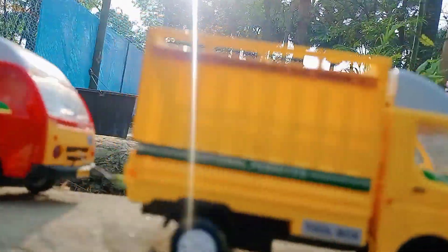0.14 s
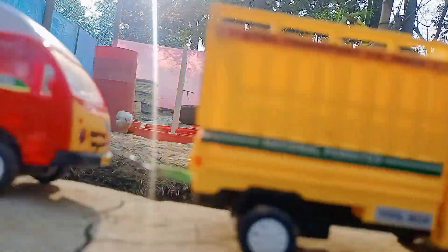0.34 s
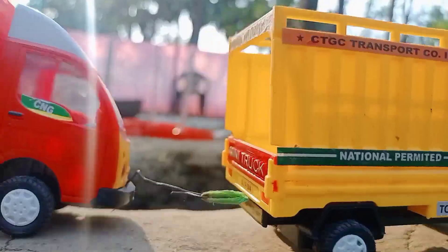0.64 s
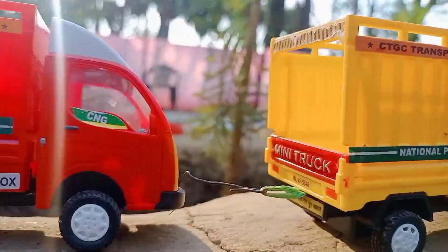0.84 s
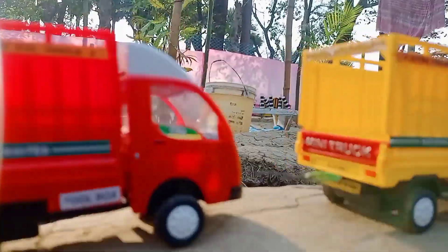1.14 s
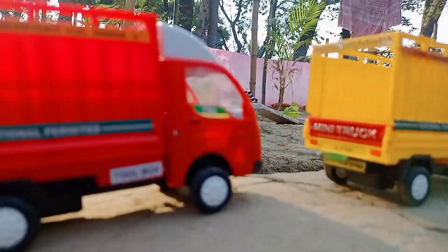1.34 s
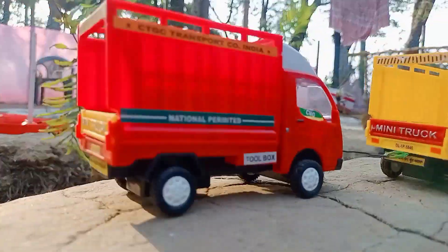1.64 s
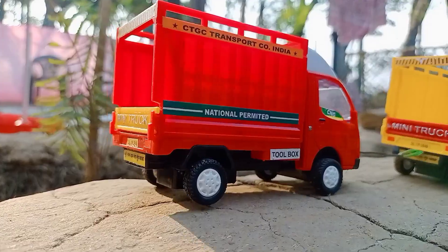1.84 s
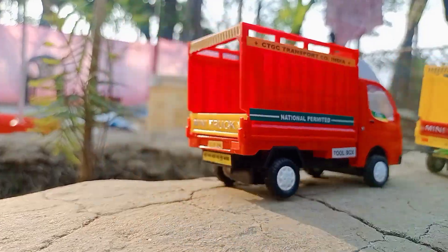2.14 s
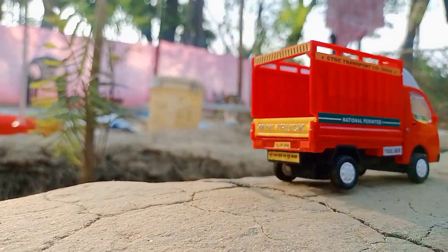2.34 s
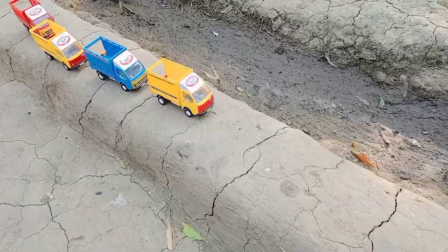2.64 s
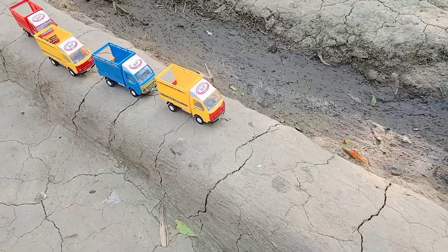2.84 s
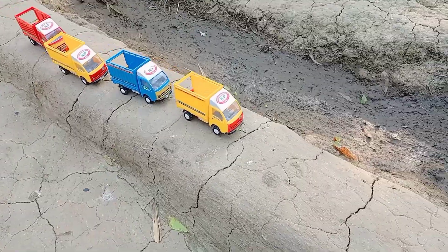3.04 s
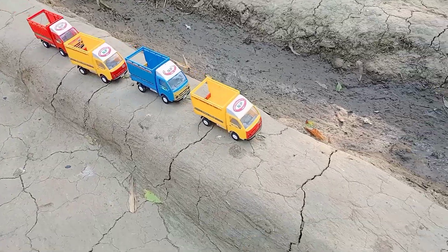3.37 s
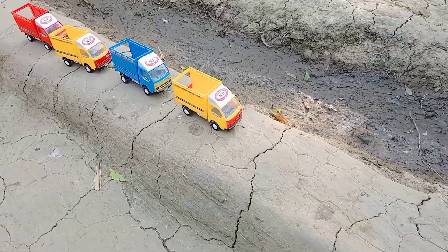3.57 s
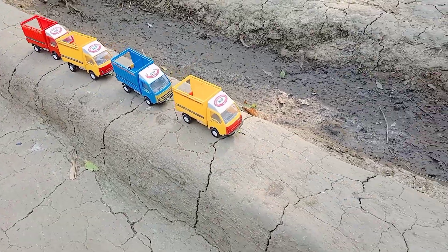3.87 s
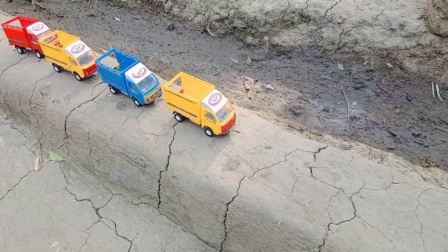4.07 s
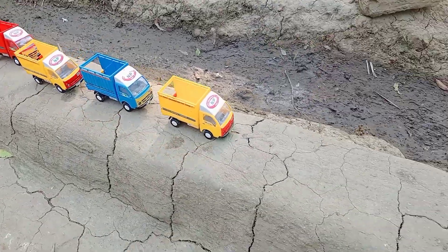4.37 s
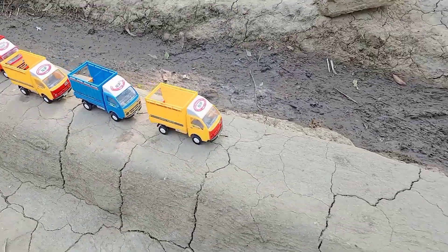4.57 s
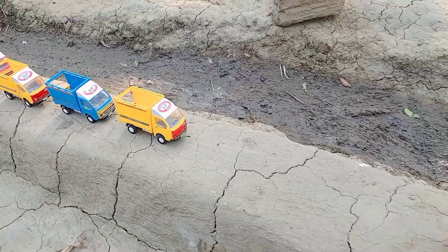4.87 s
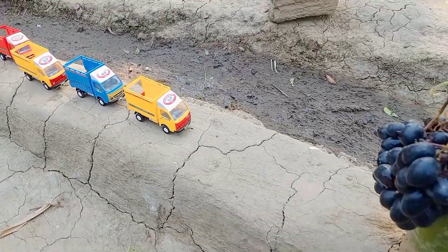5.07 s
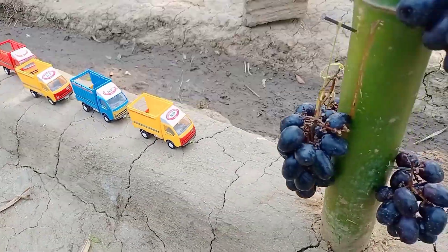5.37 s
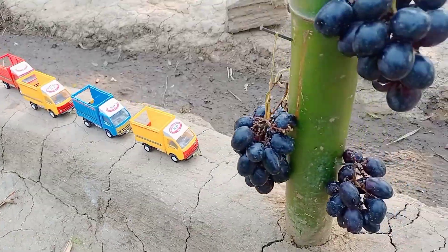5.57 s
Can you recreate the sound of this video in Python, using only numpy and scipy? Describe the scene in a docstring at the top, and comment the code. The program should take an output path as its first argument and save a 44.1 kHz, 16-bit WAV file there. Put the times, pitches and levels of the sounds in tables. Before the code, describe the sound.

Hard little wheels crunch over grit and drop into cracks, making the hollow plastic bodies of toy trucks knock and rattle in irregular spurts. The sound starts light, then builds through the second half into a louder, steadier rolling hiss with busy clicking. Thin, short squeaks and a few soft bumps on the microphone appear toward the end. It is heard close up outdoors, nearly dry, with a faint distant hum underneath.

```python
"""Hollow plastic toy trucks, pulled on a string over rough, cracked ground outdoors, close to a phone.
Wheels drop into cracks and knock cargo box, cab and axle into decaying modes. Hard wheels grind and
snap grit and shake loose parts; the rolling dips when the string slackens. Later a longer row of
trucks rolls louder. Brief, narrow tones glide within the rolling noise. Ground and walls add short
scatter. A few soft thumps reach the microphone, and a low distant drone lies underneath."""
import sys
import numpy as np
from scipy import signal
from scipy.fft import rfft, irfft, next_fast_len
from scipy.io import wavfile
from scipy.ndimage import uniform_filter1d

SR = 44100
rng = np.random.default_rng(int(sys.argv[2]) if len(sys.argv) > 2 else 0)


def inscribe(sig):
    """Save sig as 16-bit PCM at rate SR to the path in sys.argv[1].

    A 1-D sig is mono; a 2-D sig holds one channel per row.
    Samples are clipped to [-1, 1] before scaling.
    """
    pcm = np.round(np.clip(np.atleast_2d(sig).T, -1, 1) * 32767)
    wavfile.write(sys.argv[1], SR, pcm.astype(np.int16))


N = 251811

# Modes of cargo box, cab and axle. Each row: frequency in Hz, relative level in dB, T60 in seconds.
BOX_MODES = [(508, -17.5, 0.12), (655, -18.5, 0.11), (890, -5, 0.05), (1122, -6, 0.14), (1338, 3.5, 0.068),
             (1550, 7, 0.044), (1733.5, 3.4, 0.076), (1900, 6.5, 0.04), (2260, -48, .025)]
CAB_MODES = [(2483, -2, 0.025), (2770, -13, 0.03), (3082, 3, 0.067), (3266, 11.5, 0.022), (3573, 9, 0.0064),
             (3867, 6, 0.02), (4095, 2, 0.037), (4320, -38, 0.014)]
AXLE_MODES = [(5780, -5.5, 0.017), (6900, -27, 0.004), (8024, 17.5, 0.013), (9220, 7, 0.013),
              (10500, -4, 0.0083), (12200, -15, 0.0044), (14400, -18, .012), (14500, -49, .011)]
# Knocks. Each row: time of full swing in seconds, box, cab and axle peaks in dB, T60 factor.
KNOCKS = [(0.0155, -38.5, -30, -53, 0.8), (0.0756, -29, -21, -56, 1.3), (0.1023, -28.5, -26, -50, 1.1),
          (0.126, -37, -28.5, -51, 1.1), (0.1648, -33, -31.5, -52, 0.71), (0.2104, -38, -32.5, -40, 1.2),
          (0.2897, -32, -32.5, -39, 1.2), (0.3304, -32, -28.5, -34, 1.0), (0.3555, -30, -28.5, -40, 0.5),
          (0.528, -39, -36.5, -34, 1.3), (0.577, -33.5, -28, -44, 1.7), (0.5932, -30.5, -24.5, -42, 0.8),
          (0.6771, -43.5, -39, -35, 2.4), (0.6853, -25, -14, -27, 0.53), (0.7186, -28.5, -28, -34, 1.4),
          (0.728, -31, -22, -35, 0.55), (0.7518, -34, -41, -39, 2.2), (0.7647, -34, -21.5, -42, 1.1),
          (0.8062, -30.5, -33, -46, 0.98), (0.8928, -31.5, -22.5, -36.5, 0.56),
          (0.951, -40.5, -33, -33, 2.4), (0.9632, -34.5, -24, -42, 0.78), (0.9892, -37.5, -27.5, -42, 0.77),
          (1.0541, -34, -20.5, -40, 0.5), (1.0885, -30, -22.5, -46, 0.91), (1.097, -24, -20.5, -38, 1),
          (1.106, -25, -23.5, -42, 1.5), (1.1129, -25.5, -20, -31, 0.6), (1.134, -25, -21, -47, 0.65),
          (1.1818, -26.5, -16.5, -35, 0.58), (1.2155, -33, -25, -55, 1.1), (1.2203, -33, -22, -41, 0.7),
          (1.2365, -32.5, -22, -39, 0.67), (1.361, -24, -21.5, -29, 1.8), (1.3714, -29, -17.5, -40, 0.46),
          (1.5324, -34, -30, -33, 1.4), (1.6276, -31.5, -23.5, -52, 1.6), (1.6429, -25, -16, -34, 0.46),
          (1.6744, -27, -19.5, -32.5, 1.4), (1.6876, -28, -22.5, -45, 0.71),
          (1.747, -30.5, -20.5, -38, 0.4), (1.9465, -55, -38.5, -39, 2.3), (1.9718, -41, -25.5, -43, 0.45),
          (2.0138, -40.5, -35.5, -34.5, 1.8), (2.089, -34, -22, -34, 0.43), (2.1074, -31, -24, -36, 1.3),
          (2.1412, -27, -24.5, -43, 0.86), (2.1707, -23, -19, -27, 0.69), (2.2123, -34.5, -23.5, -36, 0.67),
          (2.2288, -41.5, -27.5, -46, 0.37), (2.3205, -35, -26.5, -48, 2.9),
          (2.3321, -33, -21.5, -41, 0.78), (2.4868, -24.5, -14.5, -28, 0.54), (2.513, -29.5, -21, -43, 2.7),
          (2.5251, -21, -16.5, -31, 1.3), (2.554, -18.5, -16.5, -25.5, 1.3),
          (2.5752, -18.5, -19.5, -25.5, 0.87), (2.6612, -26.5, -23, -40, 1.4),
          (2.746, -30.5, -31.5, -44, 1.7), (2.7757, -28.5, -25, -56, 0.7), (2.877, -31, -21.5, -38, 1.1),
          (2.912, -26.5, -24.5, -56, 0.66), (2.934, -29, -26, -39, 1), (2.9656, -28, -30, -39, 0.4),
          (3.075, -35, -24, -55, 1.6), (3.1133, -25.5, -21, -42, 0.7), (3.1614, -22, -17.5, -37, 1.2),
          (3.1745, -28.5, -19, -40, 0.8), (3.2009, -27, -18, -23.5, 0.7), (3.237, -18, -19.5, -51, 2.3),
          (3.2442, -15, -16.5, -47, 2), (3.2522, -19, -13, -27, 0.89), (3.2844, -16.5, -5, -26.5, 0.6),
          (3.314, -22, -11, -36, 0.6), (3.3343, -26.5, -21.5, -40, 1.2), (3.361, -22.5, -12.5, -35, 1.1),
          (3.4132, -27, -16, -33, 0.7), (3.4499, -23.5, -17, -34, 1.5), (3.4583, -21, -15.5, -25, 1.2),
          (3.4749, -21, -20, -29, 0.93), (3.5692, -25.5, -27.5, -40, 0.82), (3.6, -25.5, -20, -44, 1.3),
          (3.6565, -20.5, -15.5, -15.5, 1), (3.7358, -11, -8, -21.5, 1.35), (3.7467, -21, -14, -21.5, 1),
          (3.8138, -22.5, -12, -27, 0.8), (3.859, -15, -5.5, -24, 0.65), (3.8723, -19.5, -14, -23, 1.3),
          (3.8816, -24.5, -16, -29, 1.5), (3.9524, -15.5, -19.5, -19.5, 0.6),
          (3.9823, -14, -12.5, -22, 0.74), (4.0073, -11.5, -16.5, -27, 0.8),
          (4.0282, -19.5, -9.5, -25, 0.88), (4.0437, -21, -11, -28, 0.5), (4.0637, -19, -13, -21.5, 1.4),
          (4.0816, -21.5, -9.5, -29, 0.96), (4.095, -17, -11.5, -32, 1.6), (4.105, -21, -9.5, -25, 0.86),
          (4.1395, -17.5, -16, -24, 0.96), (4.1678, -20, -14.5, -29, 2), (4.189, -20, -8, -30, 0.52),
          (4.2204, -21.5, -15, -36, 0.99), (4.2386, -12.5, -14, -21, 1.1), (4.2548, -8.5, -6, -15, 0.7),
          (4.283, -23.5, -10, -29, 1.3), (4.2918, -19, -12.5, -27, 1.5), (4.3597, -15, -7, -11.5, 0.6),
          (4.4181, -14.5, -17.5, -29, 3.1), (4.429, -11.5, -4.5, -12.5, 0.72),
          (4.4874, -18, -15.5, -31, 0.6), (4.521, -8, -15.5, -31, 0.92), (4.5604, -14.5, -15.5, -34, 1.3),
          (4.5795, -18.5, -17, -26, 1.9), (4.6042, -12.5, -19, -28, 0.8), (4.649, -15.5, -19, -28, 1.9),
          (4.666, -17, -9, -39, 0.85), (4.6937, -14, -16.5, -21, 1.2), (4.7126, -14, -13.5, -29, 1.8),
          (4.723, -15.5, -8, -28, 0.85), (4.7479, -15, -9, -29, 1.0), (4.7714, -17, -14, -21, 0.8),
          (4.8033, -7, -10.5, -21, 1.8), (4.8321, -14.5, -10, -21.5, 1), (4.8733, -12, -11.5, -23, 0.51),
          (4.912, -10.5, -19.5, -30, 0.7), (4.949, -10.5, -13, -18.5, 2.3), (4.9746, -12, -7, -26.5, 0.9),
          (4.9975, -8, -8, -15, 0.96), (5.0333, -13.5, -10, -27, 1.1), (5.0765, -15, -16, -27, 1.3),
          (5.1064, -17.5, -16, -31, 1.9), (5.134, -27.5, -18, -32, 1.7), (5.2137, -11, -22, -35, 1.5),
          (5.229, -9.5, -19, -31, 0.81), (5.245, -13.5, -18.5, -37, 1.8), (5.3071, -10, -8.5, -20.5, 0.76),
          (5.3344, -13.5, -13.5, -21, 1.2), (5.3899, -10.5, -17.5, -19.5, 0.81),
          (5.4424, -15, -15.5, -18.5, 1.2), (5.4586, -18, -16, -25, 1.4), (5.5077, -33, -17, -32, 2.4),
          (5.5364, -17, -17, -38, 1.3), (5.577, -12.5, -16.5, -25, 1), (5.6003, -21, -21, -28, 2.2),
          (5.6148, -20.5, -13.5, -27, 1.4), (5.6902, -25.5, -15.5, -48, 1.2)]


def knocks():
    """Wheels drop into cracks: box, cab and axle ring at once, and grit snaps."""
    peak_s, box_db, cab_db, axle_db, stretch = np.transpose(KNOCKS)
    stretch = np.clip(stretch, .3, 2.5)
    rise_s = np.clip(.003 * gain_of(0.51 * (box_db - cab_db)), .0003, .008)  # slower if the box leads
    box = part_rings(BOX_MODES, rise_s, stretch, detune=0.0581, spread_db=1.5, rough=0.54)
    cab = part_rings(CAB_MODES, rise_s, stretch, detune=0.0453, spread_db=5.5, rough=0.46)
    axle = part_rings(AXLE_MODES, rise_s, stretch, detune=0.029, spread_db=10.0, rough=1.0)
    grit = grit_bursts(rise_s, t60_s=0.023 * stretch)
    layers = (box_db, box), (cab_db, cab), (axle_db, axle), (axle_db - 16, grit)
    sounds = sum(gain_of(db)[:, None] * layer for db, layer in layers)
    out = np.zeros(N)
    for start_s, knock in zip(peak_s - rise_s, sounds):
        add(out, start_s, knock)
    return out


def part_rings(modes, rise_s, stretch, detune, spread_db, rough):
    """One ring a row, peak 1. Each blow lands elsewhere, so it reweights and detunes the modes."""
    hz, db, t60_s = np.transpose(modes)[:, None, :, None]
    t = np.arange(2000) / SR
    rise_s, stretch = rise_s[:, None, None], stretch[:, None, None]  # axes: blow, mode, time
    draws = rng.standard_normal((len(stretch), len(modes), 3))
    tune, weight, phase = np.moveaxis(draws, 2, 0)[..., None]
    decay = gain_of(db + spread_db * weight - 60 * np.maximum(t - rise_s, 0) / (t60_s * stretch))
    ring = (decay * np.sin(2 * np.pi * hz * (1 + detune * tune) * t + 2 * phase)).sum(1)
    chatter = unit_rms(smooth(rng.standard_normal(ring.shape), 24, 16))  # loose parts
    attack = np.minimum(t / rise_s[:, 0], 1) ** 1.23
    ring = ring * (1 + rough * chatter) * attack
    return ring / abs(ring).max(1, keepdims=True)


# Rolling balance. Each row: time in seconds, relative levels of box, cab and axle in dB.
PART_LEVELS = [(0.0, -1, -5.5, -10), (.8, -3, -9, -18.5), (1.6, -0.5, -2, -10), (2.7, -3, -6.5, -21),
               (3.3, 2.5, 0, -14.5), (4.2, -1, -3.5, -16.5), (4.8, -3, -6.5, -19), (5.3, -3, -6.5, -21),
               (5.71, -2.5, -4.5, -14)]
# Grit bands of box, cab and axle. Each row: low edge in Hz, high edge in Hz.
PART_BANDS = [(300, 2300), (2300, 5400), (5400, 16000)]
# Grit spectra, two near trucks and long row. Each row: frequency in Hz, relative density in dB.
NEAR_SPECTRUM = [(150, -55), (250, -33), (386, -18), (640, -12.5), (1040, -13.5), (1140, -13), (1220, -18),
                 (1910, -12.5), (2710, 3.5), (3340, 17), (4990, -19), (8120, -20.5), (16000, -51)]
ROW_SPECTRUM = [(150, -57), (250, -35.5), (547, -6), (710, -8.5), (1500, 4), (1790, -3), (2670, -1.5),
                (3460, 7.5), (4190, 0.5), (5160, -20), (6820, -17.5), (8260, -17), (10700, -27.5),
                (13900, -34), (16000, -32)]
# Resonances excited by the grit. Each row: centre in Hz, width in Hz, boost in dB.
NEAR_RESONANCES = [(659.5, 51, 11.5), (1150, 28, 7.5), (1877, 106, 14.5), (2464, 106, 8.5),
                   (8640, 1500, 10)]
ROW_RESONANCES = [(6400, 180, 6.6), (8400, 290, 9.4), (14100, 500, 5.0)]


def rolling(row_from_s=2.47):
    """Wheels grind sand and coarse grains in uneven bumps, and jolts rattle the loose parts."""
    bumps = gain_of(8.8 * np.tanh(0.62 * unit_rms(smooth(rng.standard_normal(N), 300, 150))))
    crunch = smooth(abs(clicks(per_s=260, spread_db=1.5)), 60, 40)
    sand = clicks(per_s=6000, spread_db=4.0) * bumps
    grains = crunch * rng.standard_normal(N) * bumps
    jolts = [clicks(per_s=30, spread_db=2.0) * bumps for _ in range(12)]
    parts = (BOX_MODES, -3.0, -3.0), (CAB_MODES, 1.5, -1.5), (AXLE_MODES, 2.5, -4.0)
    out = np.zeros(N)
    for (modes, grains_db, rattle_db), db, band_hz in zip(parts, curves(PART_LEVELS), PART_BANDS):
        grit = unit_rms(sand) + gain_of(grains_db) * unit_rms(grains)
        near = unit_rms(coloured(grit, NEAR_SPECTRUM, *band_hz, NEAR_RESONANCES))
        row = unit_rms(coloured(grit, ROW_SPECTRUM, *band_hz, ROW_RESONANCES))
        grind = unit_rms(np.where(np.arange(N) < row_from_s * SR, near, row))
        out += gain_of(db) * unit_rms(grind + gain_of(rattle_db) * rattle(modes, jolts))
    return string_pull() * out


def rattle(modes, jolts):
    """A loose part rings at the shared jolts and at a few of its own; rms 1."""
    rise_s = rng.uniform(0.00063, 0.0022, len(jolts))
    stretch = rng.uniform(0.58, 1.6, len(jolts))
    rings = part_rings(modes, rise_s, stretch, detune=.04, spread_db=5, rough=0.45)
    return unit_rms(sum(signal.oaconvolve(jolt + clicks(per_s=7.8, spread_db=0.0), ring)[:N]
                        for jolt, ring in zip(jolts, rings)))


# Rolling with the string taut. Each row: time in seconds, level in dB.
TAUT_LEVEL = [(0.0, -42), (.13, -43.5), (.4, -44.5), (.6, -35), (.85, -43.5), (1.11, -35), (1.37, -41.5),
              (1.7, -42.5), (2.16, -37), (2.42, -45.5), (2.52, -31.5), (3.1, -40), (3.24, -34.5),
              (3.5, -32.5), (3.8, -27), (4.1, -27), (4.4, -21), (4.65, -23.5), (4.82, -18), (4.97, -19.5),
              (5.25, -22), (5.45, -25.5), (5.71, -24.5)]
# Slack string. Each row: centre in seconds, length in seconds, depth in dB.
SLACK_DIPS = [(0.236, 0.11, 3.5), (0.515, 0.3, 4), (0.649, 0.046, 10), (0.912, 0.23, 5), (1.262, 0.24, 10),
              (1.459, 0.2, 13), (1.9, 0.51, 12.5), (1.992, .05, 7), (2.26, 0.17, 14.5), (2.454, 0.084, 6),
              (2.709, 0.06, 13.5), (2.815, 0.093, 8), (3.024, 0.21, 12.5), (3.14, 0.035, 9),
              (3.38, 0.18, 3.5), (3.55, 0.096, 5.5), (3.613, 0.12, 10.5), (3.785, 0.11, 6.5),
              (3.94, 0.25, 6), (4.126, 0.11, 8), (4.304, 0.1, 4.5), (4.502, 0.042, 2.5), (4.774, 0.047, 2),
              (4.921, 0.066, 3), (5.015, 0.15, 4.5), (5.152, 0.29, 5), (5.312, 0.056, 7),
              (5.487, 0.066, 10), (5.674, 0.11, 10.5)]


def string_pull():
    """Gain of the rolling, with a smooth dip wherever the string slackens."""
    t = np.arange(N) / SR
    dips_db = sum(depth_db * np.cos(np.pi * np.clip((t - centre_s) / length_s, -.5, .5)) ** 2
                  for centre_s, length_s, depth_db in SLACK_DIPS)
    return gain_of(curves(TAUT_LEVEL)[0] - dips_db)


# Bursting grains. Each row: start in seconds, peak in dB.
GRIT_SNAPS = [(1.052, -39), (3.6556, -16), (3.7339, -30), (3.872, -25), (3.905, -37), (3.9823, -27),
              (4.3565, -16), (4.4283, -21), (4.6907, -34), (4.7696, -26), (4.997, -32), (5.5977, -23)]


def grit_snaps():
    """The largest grains burst under a wheel with bright snaps."""
    count = len(GRIT_SNAPS)
    bursts = grit_bursts(rise_s=np.full(count, .0015), t60_s=np.full(count, 0.018))
    out = np.zeros(N)
    for (start_s, db), burst in zip(GRIT_SNAPS, bursts):
        add(out, start_s, gain_of(db) * burst)
    return out


def grit_bursts(rise_s, t60_s):
    """One snap a row, peak 1: a puff of treble noise that dies fast."""
    t = np.arange(2000) / SR
    rise_s, t60_s = rise_s[:, None], t60_s[:, None]
    envelope = np.minimum(t / rise_s, 1) ** 2 * gain_of(-60 * np.maximum(t - rise_s, 0) / t60_s)
    burst = np.diff(rng.standard_normal((len(rise_s), len(t) + 2)), 2) * envelope
    return burst / abs(burst).max(1, keepdims=True)


# Brief tones. Each row: start in seconds, length in seconds, level in dB, start and end pitch in Hz.
GLIDING_TONES = [(1.231, 0.148, -43, 2300, 2190), (4.942, 0.06, -23, 1900, 1800),
                 (5.036, 0.1, -25, 1640, 1800), (5.193, 0.1, -25, 1390, 1750),
                 (5.298, 0.195, -27, 1786, 1700), (5.52, 0.14, -28, 1750, 1750)]


def gliding_tones(pole_width_hz=200):
    """Brief, narrow, gliding tones within the rolling noise; each swells and fades."""
    pole = np.exp(-np.pi * pole_width_hz / SR)  # doubled below for steep skirts
    out = np.zeros(N)
    for start_s, length_s, db, from_hz, to_hz in GLIDING_TONES:
        noise = np.array([1, 1j]) @ rng.standard_normal((2, SR // 4))
        narrow = signal.lfilter([1], [1, -2 * pole, pole ** 2], noise)[:round(length_s * SR)]
        cycles = np.cumsum(np.linspace(from_hz, to_hz, len(narrow))) / SR
        tone = (narrow * np.exp(2j * np.pi * cycles)).real
        add(out, start_s, gain_of(db) * unit_rms(tone) * signal.windows.tukey(len(narrow), .7))
    return out


# Panel rings. Each row: start in seconds, peak in dB.
PANEL_RINGS = [(1.103, -40), (1.216, -33.5), (1.361, -39)]


def panel_rings(hz=1146, t60_s=0.2):
    """One panel of the near cargo box rings on in a single mode."""
    return pings([(start_s, db, hz, t60_s) for start_s, db in PANEL_RINGS], rise_s=0.0015, sag_s=0)


def scatter(x, t60_s=0.023, gap_s=.002, fade_hz=3.5):
    """Ground and walls reflect the moving trucks: three short noise tails, crossfaded in turn."""
    t = np.arange(5000) / SR
    tails = rng.standard_normal((3, len(t))) * gain_of(-60 * t / t60_s) * (t > gap_s)
    tails /= np.linalg.norm(tails[0])
    phase = 2 * np.pi * fade_hz * np.arange(N) / SR + np.pi * np.arange(3)[:, None] / 3
    fades = np.sqrt(2 / 3) * np.cos(phase)
    return signal.oaconvolve(x * fades, tails, axes=1)[:, :N].sum(0)


# Thumps. Each row: start in seconds, level in dB, final pitch in Hz, T60 in seconds.
THUMPS = [(4.708, -37, 95, 0.06), (5.208, -20.5, 287, 0.025), (5.241, -38, 97, 0.1),
          (5.586, -25, 105, 0.094)]


def thumps():
    """Soft thumps at the microphone: low tones that sag slightly in pitch."""
    return pings(THUMPS, rise_s=0.0044, sag_s=0.0023)


# Drone spectrum. Each row: frequency in Hz, relative density in dB.
DRONE_SPECTRUM = [(15, -46), (25, -28), (87, 8.5), (140, -2), (345, -8), (591, -7.5), (647, -17),
                  (708, -25), (900, -16), (1170, -42), (1980, -120)]
# Drone envelope. Each row: time in seconds, rms level in dB.
DRONE_LEVEL = [(0.0, -56.5), (1.5, -59), (3.15, -57), (3.32, -60.5), (3.55, -54.5), (4.2, -54.5),
               (4.47, -46.5), (4.64, -52), (5.71, -47.5)]


def drone():
    """Low noise from far away; its level wavers slightly."""
    waver = gain_of(0.4 * unit_rms(uniform_filter1d(rng.standard_normal(N), 3000)))
    noise = coloured(rng.standard_normal(N), DRONE_SPECTRUM)
    return gain_of(curves(DRONE_LEVEL)[0]) * unit_rms(noise * waver)


def pings(events, rise_s, sag_s):
    """Decaying sines that start sharp by the fraction sag_s / settle_s."""
    t, settle_s = np.arange(9000) / SR, 0.021
    out = np.zeros(N)
    for start_s, db, hz, t60_s in events:
        cycles = hz * (t + sag_s * (1 - np.exp(-t / settle_s)))
        envelope = gain_of(db - 60 * t / t60_s) * np.minimum(t / rise_s, 1)
        add(out, start_s, envelope * np.sin(2 * np.pi * cycles))
    return out


def clicks(per_s, spread_db):
    """Random clicks of either sign; most are small, a few large."""
    size = gain_of(spread_db * np.minimum(rng.exponential(1, N), 4)) * rng.choice([-1., 1.], N)
    return size * (rng.random(N) < per_s / SR)


def coloured(x, spectrum, lo_hz=0, hi_hz=SR, resonances=()):
    """Filters x by a spectrum plus resonances, between two soft band edges."""
    size = next_fast_len(N)
    hz = np.fft.rfftfreq(size, 1 / SR) + 1
    point_hz, point_db = np.transpose(spectrum)
    db = np.interp(np.log(hz), np.log(point_hz), point_db)
    db += sum(boost_db / (1 + (2 * (hz - mid) / width) ** 2) for mid, width, boost_db in resonances)
    band = 1 / np.sqrt((1 + (lo_hz / hz) ** 16) * (1 + (hz / hi_hz) ** 16))
    return irfft(rfft(x, size) * gain_of(db) * band, size)[:N]


def curves(table):
    """Interpolates timed rows to one value a sample for each column."""
    times_s, *columns = np.transpose(table)
    return np.array([np.interp(np.arange(N) / SR, times_s, column) for column in columns])


def smooth(x, first_samples, second_samples):
    """Two moving averages in series."""
    return uniform_filter1d(uniform_filter1d(x, first_samples), second_samples)


def gain_of(db):
    """Decibels to amplitude."""
    return 10 ** (np.asarray(db) / 20)


def unit_rms(x):
    """Scales to rms 1 along time."""
    return x / np.sqrt(np.mean(x ** 2, -1, keepdims=True) + 1e-20)


def add(mix, start_s, sound):
    """Mixes a sound in from start_s."""
    part = mix[round(start_s * SR):][:len(sound)]
    part += sound[:len(part)]


def scene():
    """Trucks with their scatter, over drone and thumps; mono."""
    trucks = knocks() + grit_snaps() + rolling() + gliding_tones() + panel_rings()
    bass_cut = signal.butter(2, 330., "high", fs=SR, output="sos")  # small shells radiate no bass
    trucks = signal.sosfilt(bass_cut, trucks)
    return (trucks + gain_of(-23.0) * scatter(trucks) + drone() + thumps())[None]


def record(dry):
    """The phone adds faint microphone hiss and cuts deep bass and the top treble."""
    hiss_db, low_hz, high_hz = -75, 50., 15600
    noisy = dry + gain_of(hiss_db) * rng.standard_normal(dry.shape)
    thin = signal.sosfilt(signal.butter(2, low_hz, "high", fs=SR, output="sos"), noisy)
    lowpass = signal.firwin(511, high_hz, window=("kaiser", 9), fs=SR)
    return signal.oaconvolve(thin, lowpass[None], "same")


dry = scene()
out = record(dry)
inscribe(out)
```